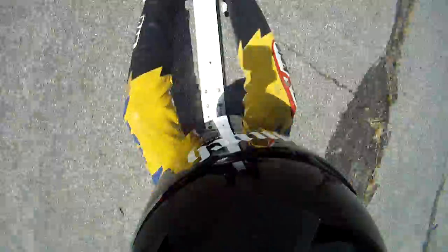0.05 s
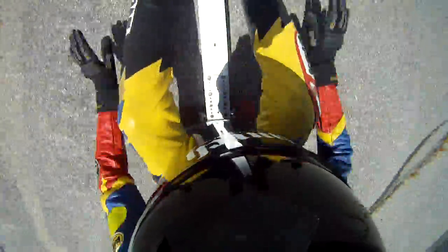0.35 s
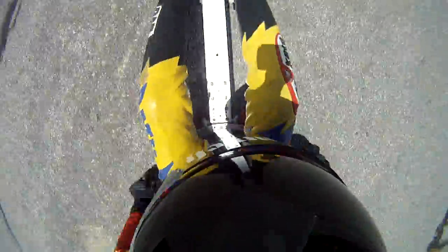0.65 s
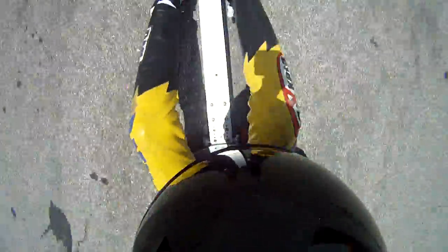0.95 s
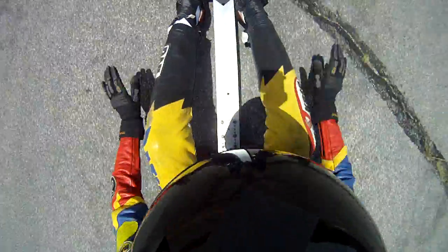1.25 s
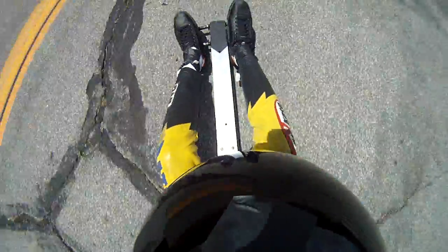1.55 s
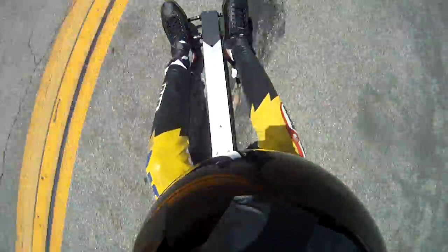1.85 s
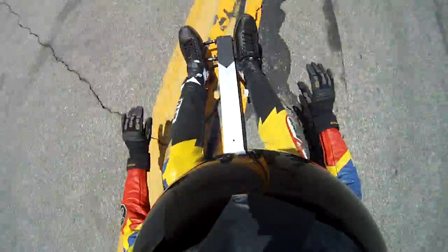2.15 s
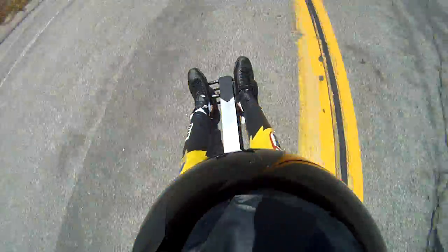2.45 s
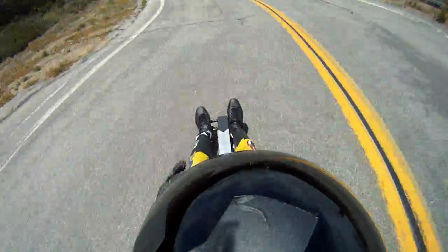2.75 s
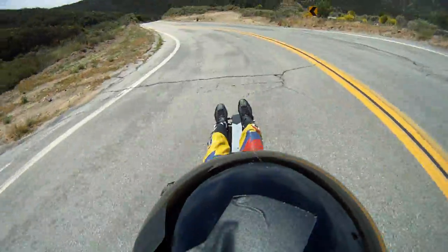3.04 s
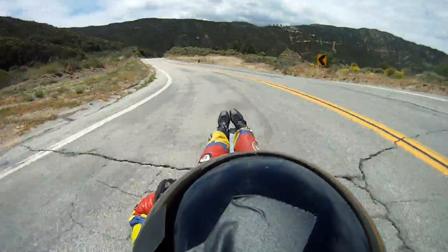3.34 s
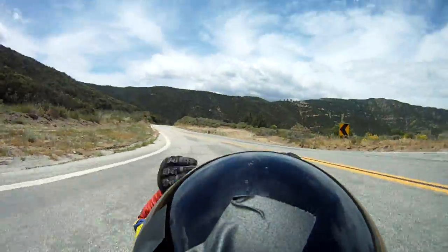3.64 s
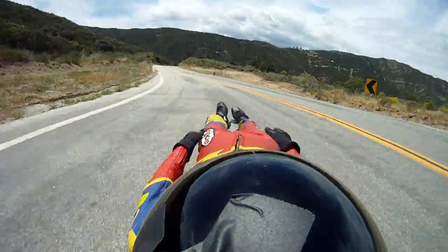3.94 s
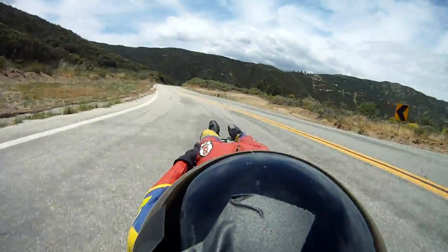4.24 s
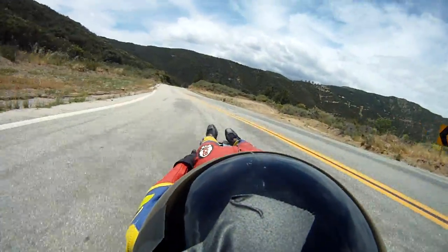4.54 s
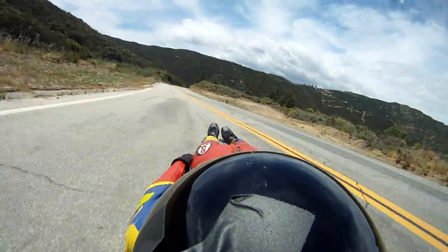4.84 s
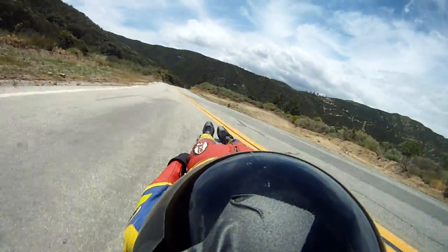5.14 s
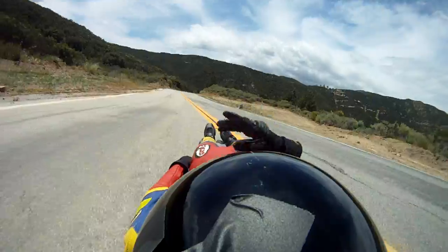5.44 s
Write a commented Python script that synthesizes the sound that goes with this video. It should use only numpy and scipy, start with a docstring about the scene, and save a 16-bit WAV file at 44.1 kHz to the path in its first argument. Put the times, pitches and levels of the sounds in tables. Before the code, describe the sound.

Low wind buffeting and the hollow roar of small wheels on coarse asphalt run throughout, close to a helmet microphone on an open road. The helmet hums with vibration, and its plastic mount rattles, clacks and thumps as the luge hits bumps. The rattle rings a little more midway, then an airy hiss joins in while the rolling and gusts carry on.

```python
"""A street luge rolls fast down rough asphalt, heard from a camera on the rider's helmet.
From the start, wind buffets the microphone, road vibration drones in the helmet shell and the mount
chatters and knocks; the camera's low-rate sample hold adds a glassy fizz. From about 2 s to 4 s a long
bend loads the mount, which rings more. By 3.5 s the rider lies back, and out of the bend a thin hiss
of air comes forward."""
import sys
import numpy as np
from scipy import signal
from scipy.fft import rfft, irfft
from scipy.io import wavfile
from scipy.ndimage import uniform_filter1d

SR = 44100
rng = np.random.default_rng(int(sys.argv[2]) if len(sys.argv) > 2 else 0)


def dump_mix(stems):
    """Bounce the given channels to the path in sys.argv[1] as a 16-bit WAV at rate SR."""
    frames = np.atleast_2d(stems).T  # one column per channel
    limited = np.clip(frames, -1, 1)  # hard clip at full scale
    pcm = np.round(limited * 32767).astype(np.int16)
    wavfile.write(sys.argv[1], SR, pcm)


N = 246519
TIME = np.arange(N) / SR


def gain(db):
    return 10 ** (np.asarray(db) / 20)


def noise(size=N):
    return rng.standard_normal(size)


def curve(table):
    return np.interp(TIME, *np.transpose(table))


def unit_rms(x):
    return x / np.sqrt(np.mean(x ** 2) + 1e-20)


def steady(x, samples):
    """Divides by the running RMS: slow swells go, fast grain stays."""
    return x / np.sqrt(abs(uniform_filter1d(x ** 2, samples)) + 1e-12)


def unit_burst(x, samples=353):
    """Scales to the energy of 8 ms at unit level."""
    return x * np.sqrt(samples / np.sum(x ** 2))


def add(mix, start_s, sound):
    part = mix[max(round(start_s * SR), 0):][:len(sound)]
    part += sound[:len(part)]


def colour(x, spectrum, size=4096):
    """Minimum-phase filter with the given spectrum."""
    hz, db = np.transpose(spectrum)
    log_hz = np.log(abs(np.fft.fftfreq(size, 1 / SR)) + 1)
    log_gain = np.log(gain(np.interp(log_hz, np.log(hz), db)))
    impulse = np.fft.ifft(np.exp(np.conj(signal.hilbert(log_gain)))).real
    return signal.oaconvolve(x, impulse[:size // 2])[:len(x)]


def resonate(x, hz, width_hz):
    """Steep-skirted resonance; hz may vary in time."""
    carrier = np.exp(2j * np.pi * np.cumsum(hz * np.ones(N)) / SR)
    pole = np.exp(-np.pi * width_hz / SR)
    return (carrier * signal.lfilter([(1 - pole) ** 2], [1, -2 * pole, pole * pole], x / carrier)).real


def flutter(rate_hz):
    """Low-passed random wander, unit RMS."""
    hz = np.fft.rfftfreq(N, 1 / SR)
    return unit_rms(irfft(rfft(noise()) / (1 + (hz / rate_hz) ** 2), N))


def impulses(per_s):
    return rng.random(N) < per_s / SR


def scatter(spread_db):
    return gain(spread_db * np.clip(noise(), -2, 2))


def decay(hits, decay_s):
    return signal.lfilter([1], [1, -np.exp(-1 / (decay_s * SR))], hits)


def trapezoid(start_s, length_s, ramp_s):
    return np.clip(np.minimum(TIME - start_s, start_s + length_s - TIME) / ramp_s + .5, 0, 1)


# Rider's posture: t/s, recline (0 sitting, 1 lying)
RECLINE = [(0, 0), (2.4, 0.21), (3.5, 1), (3.8, 0.98), (3.92, 0.98), (5.59, 0.95)]


def posture(sitting_db, lying_db):
    """Gain that follows the rider's recline."""
    return gain(sitting_db + (lying_db - sitting_db) * curve(RECLINE))


def bend(db):
    """Gain that shifts by db through the long bend."""
    return gain(db * trapezoid(start_s=2.2, length_s=1.58, ramp_s=0.62))


# Coarse asphalt: t/s, length/s, roar rise/dB, chatter rise/dB
PATCHES = [(0.103, 0.22, 1, 1), (0.458, 0.055, 3, 9.5), (0.586, 0.14, 4.5, -0.5), (0.805, .1, 4, 3.5),
           (1.041, 0.042, 6.5, 4), (1.323, 0.094, 2.5, 1.5), (1.589, 0.13, 3, 6.5), (1.78, 0.041, 4.5, 3),
           (1.969, 0.093, 4, 4.5), (2.086, 0.17, 4, 0.5), (2.476, 0.091, 2, 6.5), (2.67, 0.073, 4, 1.5),
           (2.878, .16, 1.5, 8), (3.137, 0.095, 1.5, 7.5), (3.493, 0.093, 2.5, 8), (3.623, 0.06, 0, 5.5),
           (3.68, 0.059, 1, 13), (4.054, 0.39, 2, 2), (5.154, 0.46, 0.5, 2.5)]
ROAR_RISE, CHATTER_RISE = 2, 3


def patches(column):
    """Gain as the wheels cross the coarse stretches."""
    return gain(sum(row[column] * trapezoid(row[0], row[1], ramp_s=0.022) for row in PATCHES))


# Lulls: t/s, length/s, level/dB
LULLS = [(0.545, 0.043, -3), (0.95, 0.029, -3), (1.285, .04, -2), (1.471, 0.025, -5.5), (2.24, 0.051, -3.5),
         (2.515, 0.025, -7), (2.81, 0.032, -5), (3.073, 0.046, -2.5), (3.535, 0.061, -3),
         (3.738, .09, -5.5), (4.742, .05, -5)]


def lulls():
    """The level dips briefly."""
    return gain(sum(db * trapezoid(s, length_s, ramp_s=0.028) for s, length_s, db in LULLS))


# Helmet cavity and visor gap resonances: f/Hz, width/Hz, level/dB
AIR_MODES = [(555.4, 130, 18), (1630, 2000, -0.5), (2480, 160, -6.5), (4160, 910, 0), (5200, 320, -4.5)]
# Suit fold resonances: f/Hz, width/Hz, level/dB
SUIT_MODES = [(1650, 390, 2), (2000, 2300, -7.5), (2460, 330, -13), (4140, 1000, -2.5)]


def airstream(flicker_db=3, flick_db=-2):
    """Air howls in the helmet, whistles in the visor gaps and flicks the folds of the suit."""
    hiss = sum(gain(db) * unit_rms(resonate(noise(), hz, width)) for hz, width, db in AIR_MODES)
    flicks = impulses(per_s=75) * scatter(spread_db=3)
    suit = sum(gain(db) * unit_rms(resonate(flicks * noise(), hz, width)) for hz, width, db in SUIT_MODES)
    air = hiss * gain(flicker_db * flutter(rate_hz=57)) + gain(flick_db) * suit
    return air * posture(sitting_db=-56.5, lying_db=-41.5) * bend(db=-7.5)  # visor turns out of the flow


# Sharp snap spectrum: f/Hz, level/dB
SNAP_SPECTRUM = [(300, 1), (1100, 2.5), (1900, -10), (3000, -8), (4200, -3), (5000, -13), (6000, -9.5)]


def pebbles():
    """Small stones under the wheels snap lightly at random."""
    hits = impulses(per_s=6) * scatter(spread_db=2)
    scrape = decay(hits, decay_s=0.0015) * noise()
    return unit_rms(colour(scrape, SNAP_SPECTRUM)) * posture(sitting_db=-46, lying_db=-45) * bend(db=-4)


# Eddy spectrum: f/Hz, level/dB
EDDY_SPECTRUM = [(10, -17), (25, -8.5), (50, -4), (90, -1.5), (130, -2.5), (165, -3.5), (210, -1.5),
                 (300, -24.5), (600, -19), (2000, -52)]
# Wind envelope: t/s, level/dB
WIND_LEVEL = [(0.04, -25.5), (0.3, -22), (.75, -20.5), (1.35, -24.5), (1.55, -29.5), (1.7, -21),
              (2.35, -19), (3, -23.5), (4.35, -25.5), (4.57, -20), (5.59, -20)]
# Deep buffets: t/s, peak level/dB, half-width/s
GUSTS = [(1.87, -8, 0.03), (2.234, -9, 0.06), (2.393, -14, 0.017), (3.69, -11.5, 0.018),
         (4.68, -9.5, 0.025), (4.88, -20, .025), (5.084, -9, 0.04)]


def wind(flutter_db=0.3, eddy_db=-1, deep_db=-9):
    """Eddies flutter on the microphone; now and then a big one pushes on it."""
    eddies = colour(noise(), EDDY_SPECTRUM) * gain(flutter_db * flutter(rate_hz=24))
    buffet = steady(eddies, samples=5000) * gain(curve(WIND_LEVEL))
    deep = steady(resonate(noise(), hz=42, width_hz=60), samples=2500)
    pushes = sum(gain(db) * np.exp(-((TIME - s) / width_s) ** 2) for s, db, width_s in GUSTS)
    return gain(eddy_db) * buffet + gain(deep_db) * deep * pushes


# Wheel roar spectrum: f/Hz, level/dB
ROAR_SPECTRUM = [(150, -30), (330, -1.5), (420, -5), (490, -4.5), (545, -0.5), (610, -2), (690, -8.5),
                 (780, -12.5), (840, -10), (920, -18.5), (1070, -12.5), (1300, -25), (2500, -25.5),
                 (6000, -47.5)]
# Hollow between helmet and shoulders, retuned as the head moves: t/s, f/Hz
HOLLOW_PITCH = [(0, 515), (1.4, 519), (2.1, 538), (2.6, 495), (3.0, 462), (3.25, 540), (3.55, 538),
                (4.1, 552), (5.59, 566)]


def wheel_roar(road, bump_db=2.5):
    """Wheels roar on the asphalt's grain; the hollow under the helmet resonates."""
    grain = noise((2, N)) * gain(bump_db * road)
    howl = unit_rms(resonate(grain[0], curve(HOLLOW_PITCH), width_hz=115))
    roar = unit_rms(colour(grain[1], ROAR_SPECTRUM))
    return steady(roar + howl, samples=2500) * posture(sitting_db=-22, lying_db=-20) * patches(ROAR_RISE)


# Helmet shell modes by name: f/Hz, width/Hz
SHELL_MODES = {"drone": (244.4, 29.6), "flex": (288.5, 60)}
# Drone envelope: t/s, level/dB
DRONE_LEVEL = [(0, -23), (.9, -20), (2, -18), (2.35, -19), (2.8, -16.5), (3.45, -13.5), (3.65, -23.5),
               (3.95, -15.5), (5.59, -17.5)]
# Brief drone swells: t/s, rise/dB
SWELLS = [(.27, 9), (.69, 8), (1.02, 7), (1.229, 10), (1.93, 5.5), (2.79, 3.5), (4.44, 4), (4.73, 7.5),
          (4.91, 2)]


def shell_drone(road, bump_db=2.5, swell_s=0.034, trim_db=-2.5):
    """Road vibration rings the helmet shell; its upper mode grows as the rider leans back."""
    grain = noise((2, N)) * gain(bump_db * road)
    lower = unit_rms(resonate(grain[0], *SHELL_MODES["drone"]))
    upper = unit_rms(resonate(grain[1], *SHELL_MODES["flex"])) * posture(sitting_db=-11.5, lying_db=2.5)
    swell_db = sum(db * np.exp(-((TIME - s) / swell_s) ** 2) for s, db in SWELLS)
    envelope = gain(curve(DRONE_LEVEL) + swell_db + trim_db) * bend(db=0.5)
    return steady(lower + upper, samples=3500) * envelope


# Mount clack spectrum: f/Hz, level/dB
CLACK_SPECTRUM = [(200, -0.5), (600, -0.5), (1080, 4.5), (1400, -2.5), (1900, 3.5), (2270, 0), (2720, -2.5),
                  (3100, -1), (3400, -7.5), (4300, -9), (5000, -17), (6000, -19.5)]


def mount(force):
    """The plastic mount clacks, and rings more under load in the bend."""
    clack = colour(force, CLACK_SPECTRUM)
    return clack + resonate(2 * clack * bend(db=8), hz=2700, width_hz=480)


def shaking(aftershake_db=2.5, aftershake_s=0.023):
    """The mount shakes harder on coarse asphalt and just after each knock."""
    after = sum((TIME > s) * np.exp(-abs(TIME - s) / aftershake_s) for s, *_ in KNOCKS)
    return posture(sitting_db=-36, lying_db=-37.5) * patches(CHATTER_RISE) * gain(aftershake_db * after)


def chatter(road, bounce_hz=50, jitter=0.17, grit_db=-6, tick_db=9, scrape_floor=0.22, bump_db=1):
    """The loose mount bounces and grit adds stray hits; each contact is a tick and a short scrape."""
    cycles = np.cumsum(bounce_hz * (1 + jitter * flutter(rate_hz=30))) / SR
    bounces = np.diff(np.floor(cycles), prepend=0)
    grit = gain(grit_db) * impulses(per_s=150)
    blows = (bounces + grit) * scatter(spread_db=3)
    scrape = (scrape_floor + decay(blows, decay_s=0.002)) * noise()
    force = (gain(tick_db) * blows + scrape) * gain(bump_db * road)
    return steady(mount(force), samples=3000) * shaking()


# Shell thump spectrum: f/Hz, level/dB
THUMP_SPECTRUM = [(40, -21), (170, -15.5), (250, -4), (370, 6.5), (530, 7), (680, 2), (1000, -16),
                  (1500, -37), (6000, -68)]
# Knocks: t/s, clack level/dB, thump level/dB, snap share (0-1)
KNOCKS = [(0.045, -16.5, -22, 0.1), (0.057, -19, -19, 0), (0.1109, -25, -12, 0.1), (0.1861, -33, -19, 0.3),
          (0.2884, -29, -15, 1), (0.385, -31, -20, 1), (0.539, -22, -25, 0.4), (0.5434, -15.5, -22, 0.36),
          (0.706, -33, -17, 0.9), (0.742, -25, -16, 0.66), (0.912, -24, -16, 0.55), (0.998, -19.5, -29, 0),
          (1.064, -28, -27, 0.2), (1.198, -24.5, -11.5, 0.6), (1.3309, -21.5, -16, 0.3),
          (1.37, -24.5, -35, 0.5), (1.4547, -21, -26, 0), (1.512, -26, -3, 0.1), (1.603, -29, -14, 0),
          (1.6665, -24.5, -11, 0), (1.691, -27, -10, 0), (1.8288, -31, -16, 1), (1.917, -23, -15, 0.34),
          (1.972, -26, -10, 0.1), (1.9954, -20, -10.5, 0.5), (2.012, -19, -20, 0), (2.098, -47, -10, 0.1),
          (2.157, -33, -14, 0), (2.2324, -20.5, -8.5, 0), (2.239, -33, -34, 0), (2.356, -30, -11, 0.4),
          (2.406, -27.5, -11.5, 0.46), (2.4683, -26, -6, 0), (2.5873, -30, -19, 1), (2.615, -25.5, -15, 0),
          (2.7033, -24.5, -18, 0.2), (2.8924, -22, -7.5, 0), (3.172, -31, -23, 0), (3.5422, -22, -26, 0),
          (3.6245, -23.5, -27, 0), (3.681, -18, -4, 0.73), (3.7042, -18, -10, 0), (4.1371, -23, -17, 0.3),
          (4.4356, -24, -12, 0.1), (4.638, -24.5, -34, 1), (4.88, -24, -32, .9), (5.04, -39, -13, 0.2),
          (5.202, -23, -10, 0.6), (5.325, -25, -8.5, 0.7), (5.4044, -21, -9, 0.2), (5.508, -33, -10.5, 0)]


def knocks(clack_s=0.0075, thump_s=0.005, rise_s=0.00023, strike_db=13, clack_trim_db=1, thump_trim_db=-5):
    """Cracks and stones slam the mount: a plastic strike and scrape over a thump of the shell."""
    t = np.arange(3000) / SR
    blows, out = np.zeros(N), np.zeros(N)
    strike = gain(strike_db) * (t == 0)
    scrape_envelope = (1 - np.exp(-t / rise_s)) * np.exp(-t / clack_s)
    for s, *_ in KNOCKS:
        add(blows, s, strike + rng.choice([-1., 1.], len(t)) * scrape_envelope)
    dull, bright = mount(blows), colour(blows, SNAP_SPECTRUM)
    pad_damping = np.exp(-(t / (2 * clack_s)) ** 2)
    for s, clack_db, thump_db, snap in KNOCKS:
        span = slice(round(s * SR), round(s * SR) + len(t))
        clack = pad_damping * ((1 - snap) * dull[span] + snap * bright[span])
        thump = colour(noise(len(t)) * np.exp(-t / thump_s), THUMP_SPECTRUM)
        add(out, s, gain(clack_db + clack_trim_db) * unit_burst(clack))
        add(out, s, gain(thump_db + thump_trim_db) * unit_burst(thump))
    return out


def scene():
    """All layers but the knocks dip together in the lulls."""
    road = flutter(rate_hz=12.4)  # asphalt roughness, common to shell, wheels and mount
    bed = wind() + shell_drone(road) + wheel_roar(road) + chatter(road) + pebbles() + airstream()
    return (lulls() * bed + knocks())[None]


def record(dry, start_s=0.036, guard_hz=5450, hold_hz=12000, cutoff_hz=15400):
    """The camera low-passes, holds each sample, mirroring the band around hold_hz, then low-passes again."""
    hz = np.fft.rfftfreq(N, 1 / SR)
    gated = np.clip(dry, -1, 1) * (TIME > start_s) * signal.windows.tukey(N, .001)
    band = rfft(gated) / np.sqrt(1 + (hz / guard_hz) ** 26)
    # hold steps follow the slope, so treble is mirrored most
    steps = irfft(band * 1j * hz, N) * 2 * np.cos(2 * np.pi * hold_hz * TIME)
    mirror = rfft(steps) / (1j * np.maximum(hz, hold_hz / 2))
    held = irfft(band + mirror, N)
    lowpass = signal.firwin(401, cutoff_hz, window=("kaiser", 9), fs=SR)
    return signal.oaconvolve(held, lowpass[None], "same")


dry = scene()
out = record(dry)
dump_mix(out)
```